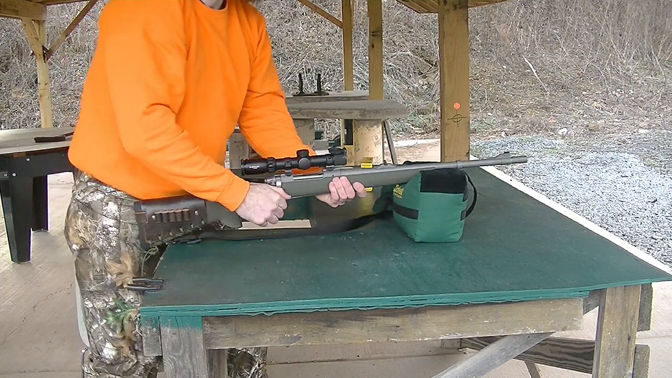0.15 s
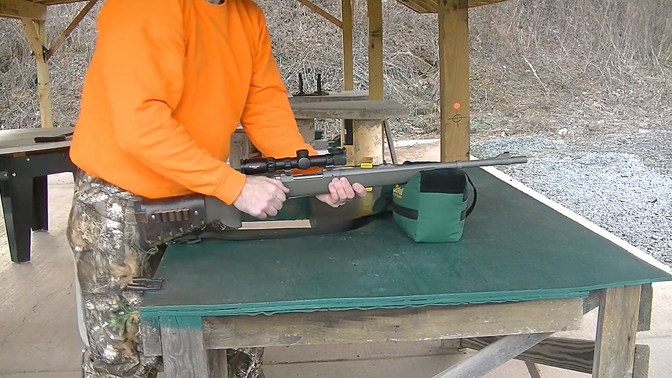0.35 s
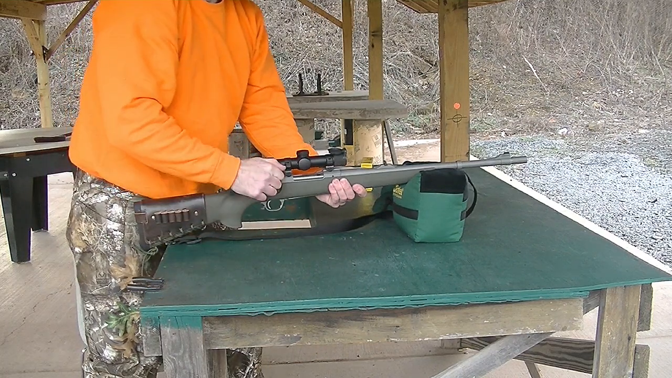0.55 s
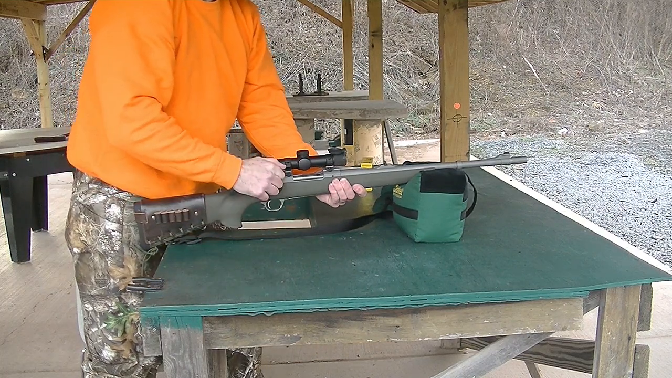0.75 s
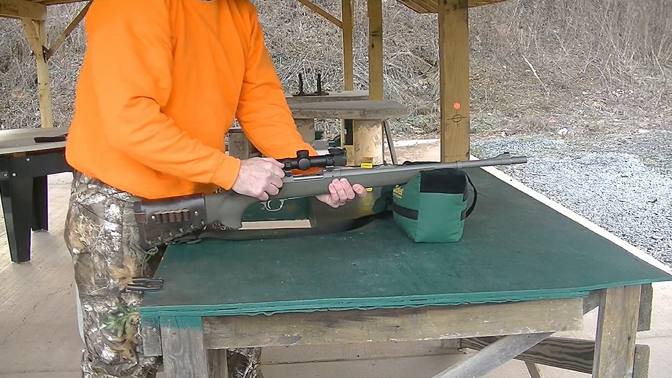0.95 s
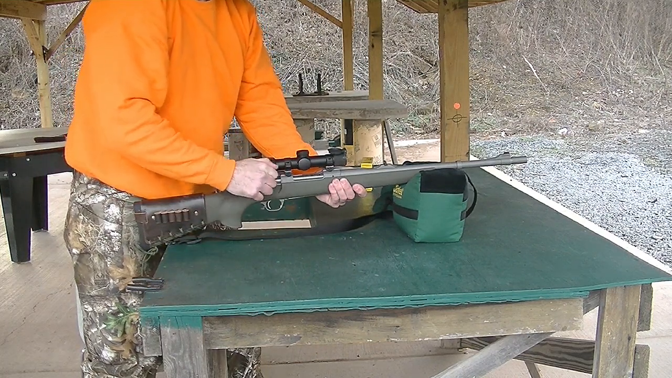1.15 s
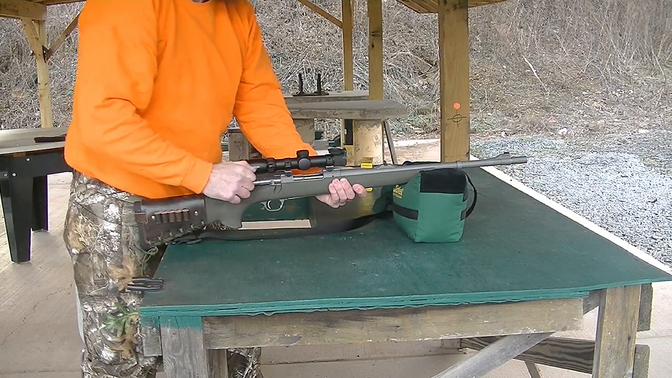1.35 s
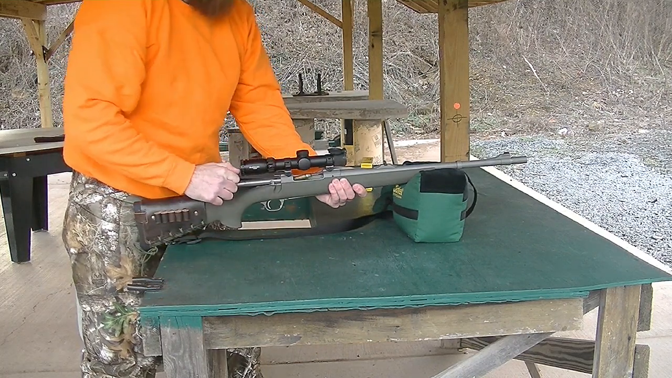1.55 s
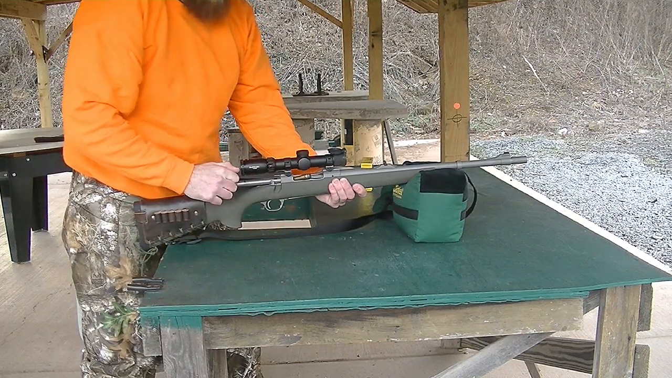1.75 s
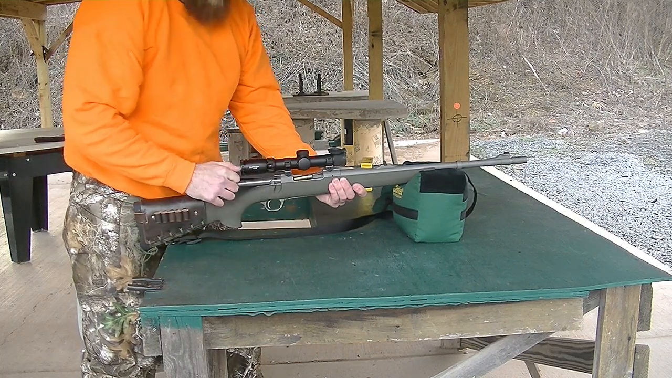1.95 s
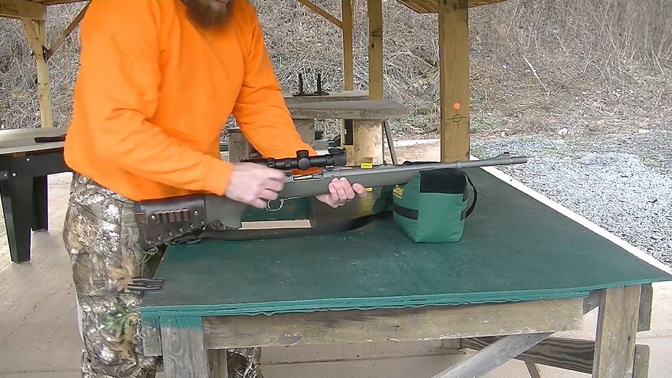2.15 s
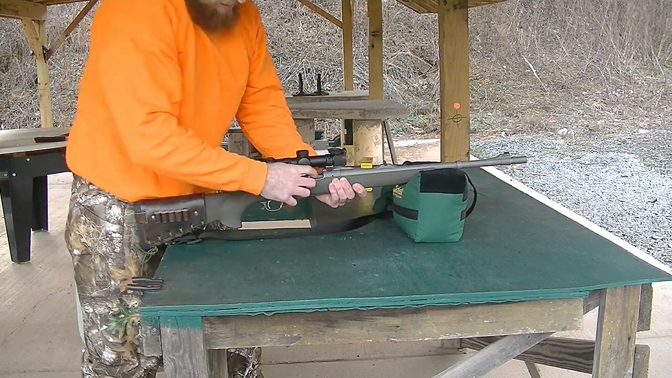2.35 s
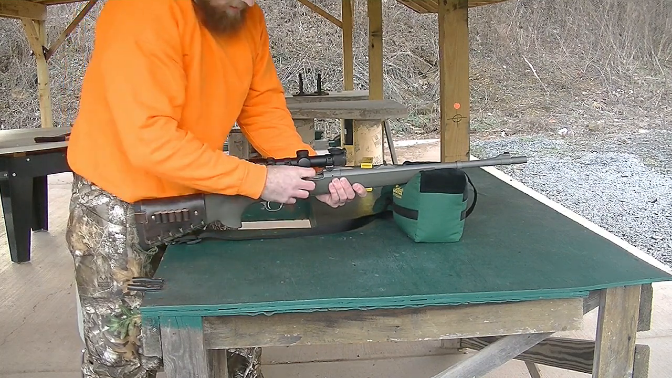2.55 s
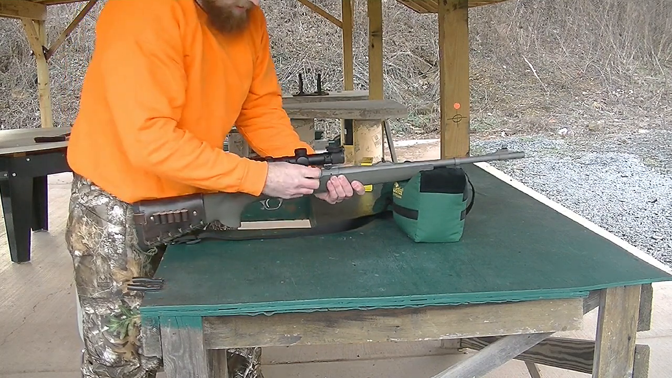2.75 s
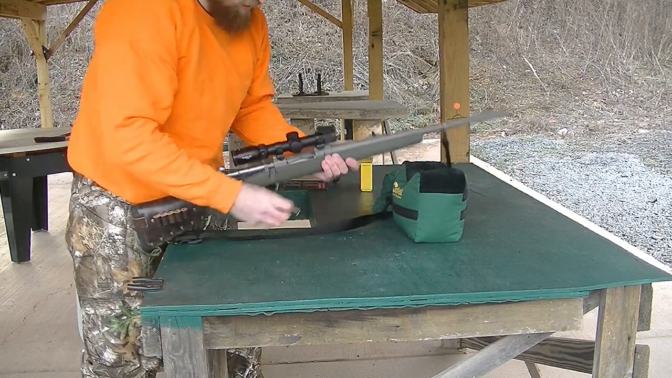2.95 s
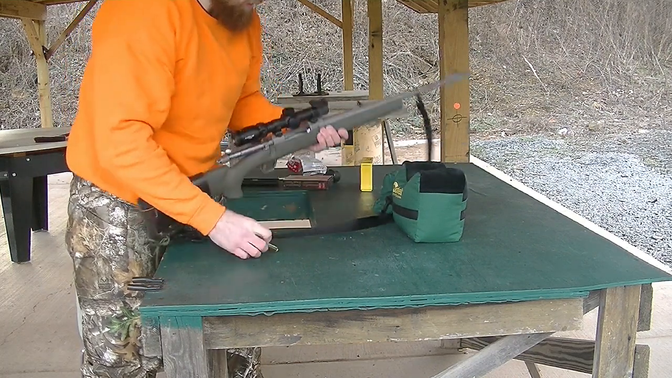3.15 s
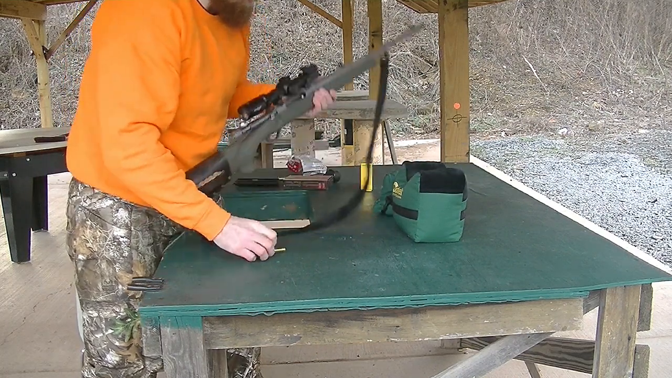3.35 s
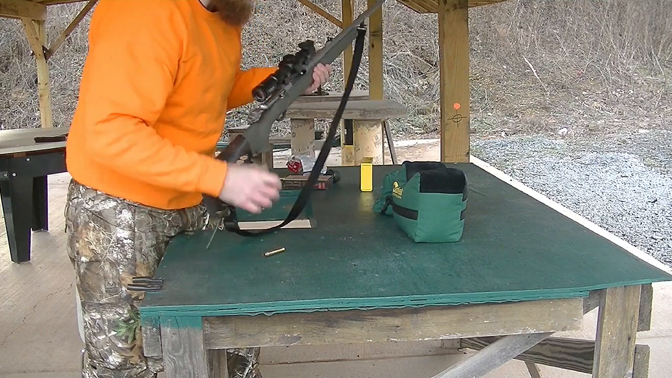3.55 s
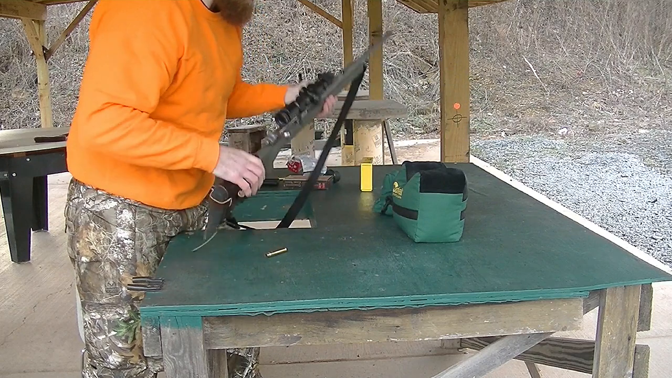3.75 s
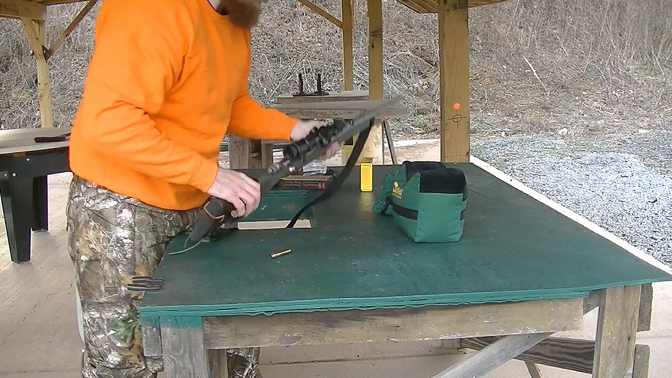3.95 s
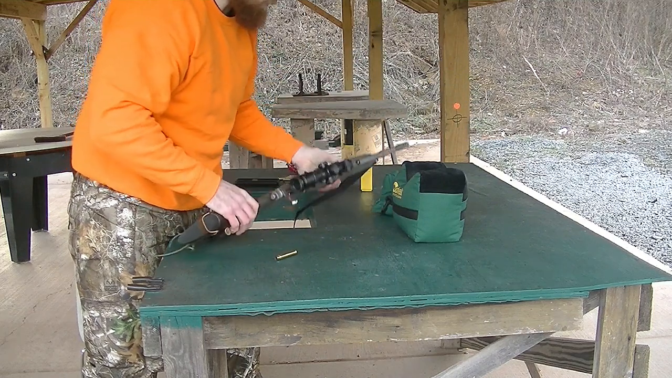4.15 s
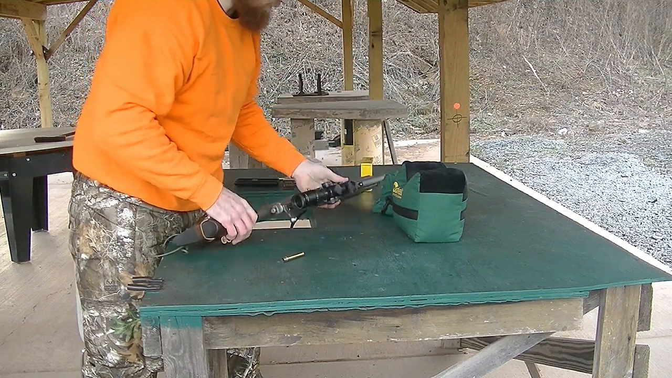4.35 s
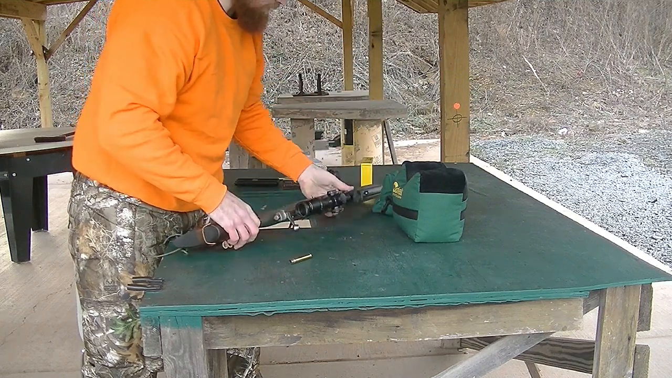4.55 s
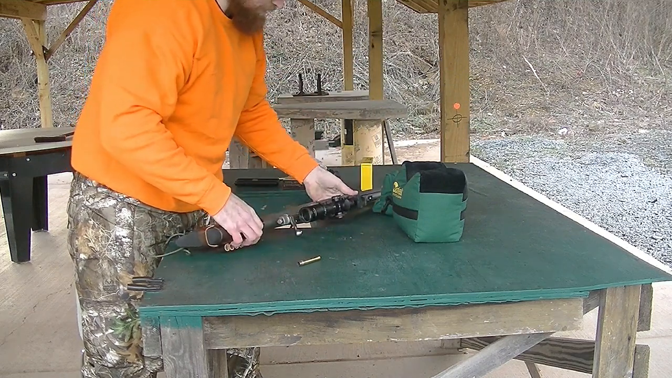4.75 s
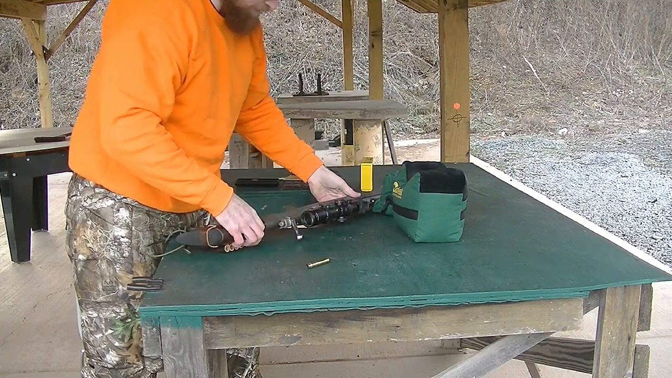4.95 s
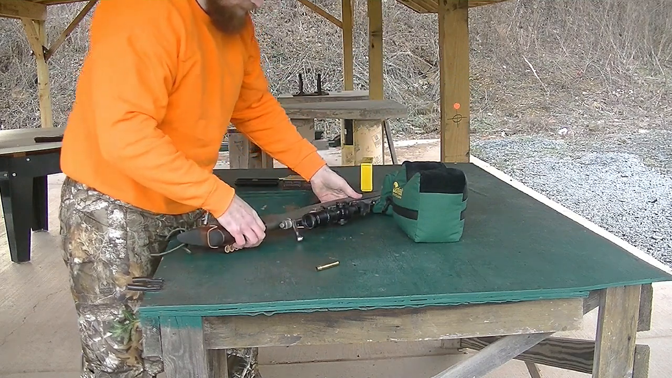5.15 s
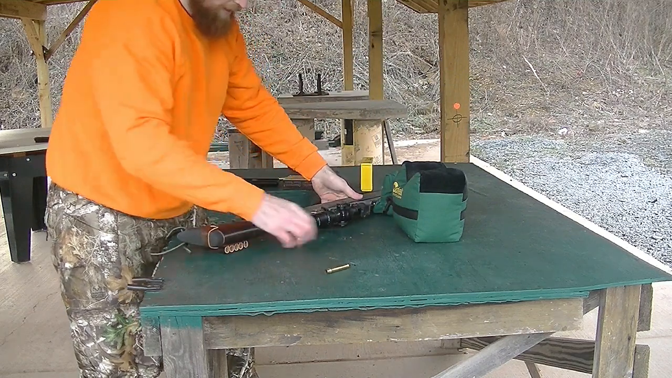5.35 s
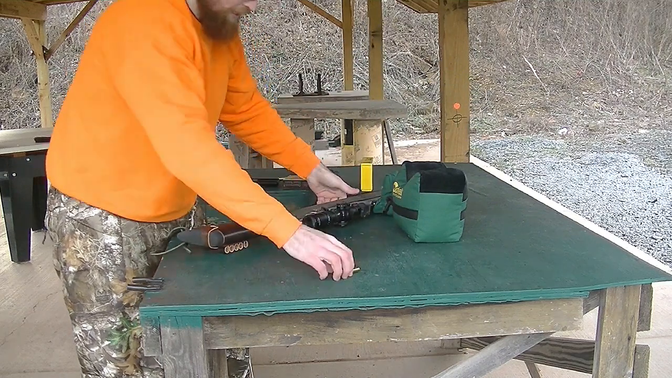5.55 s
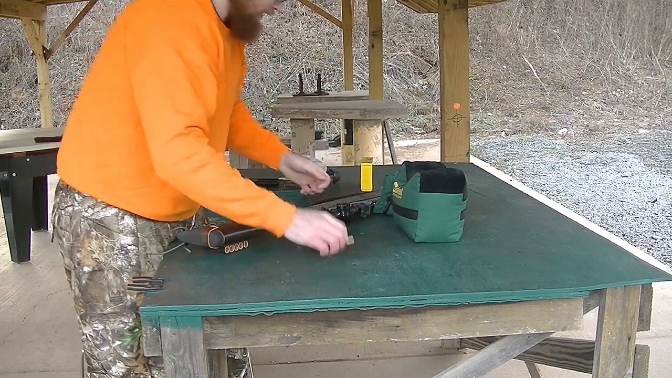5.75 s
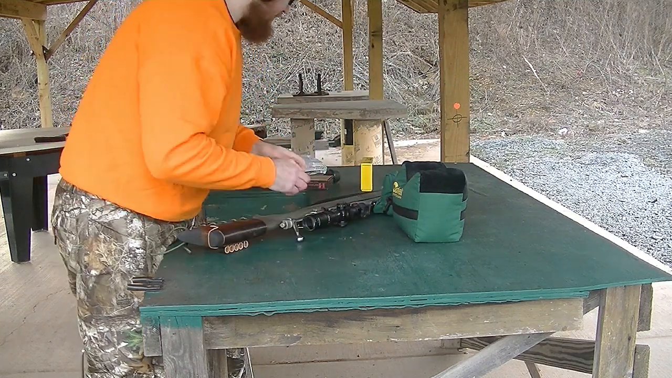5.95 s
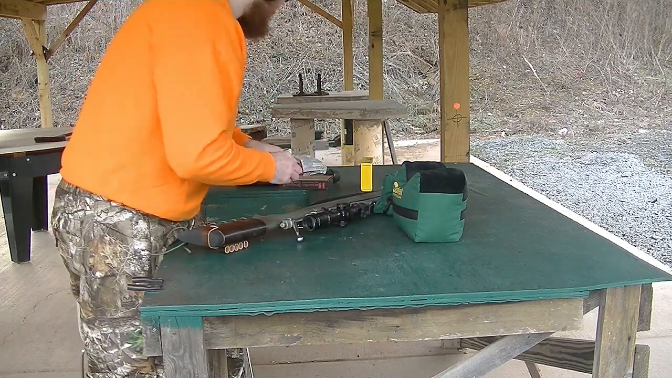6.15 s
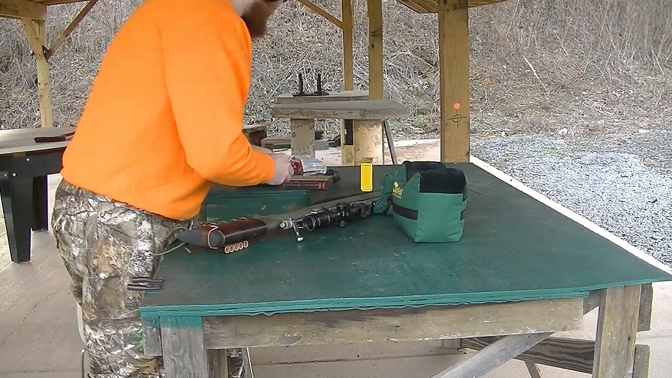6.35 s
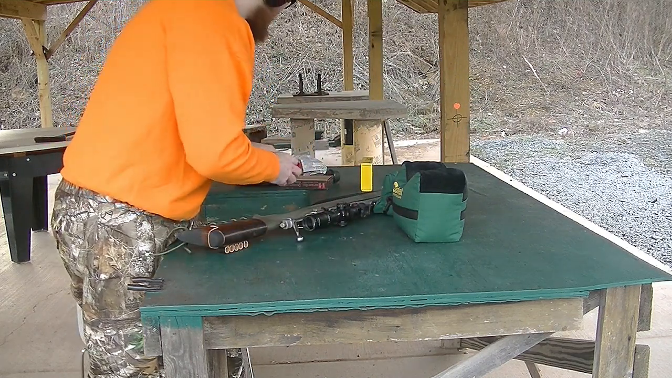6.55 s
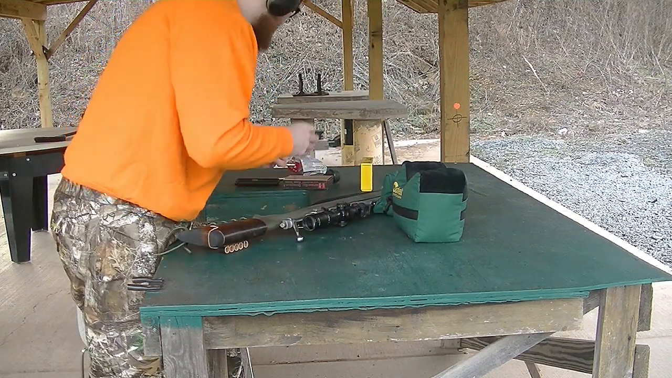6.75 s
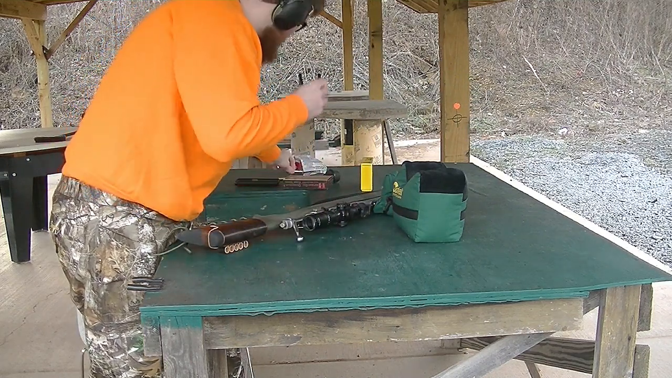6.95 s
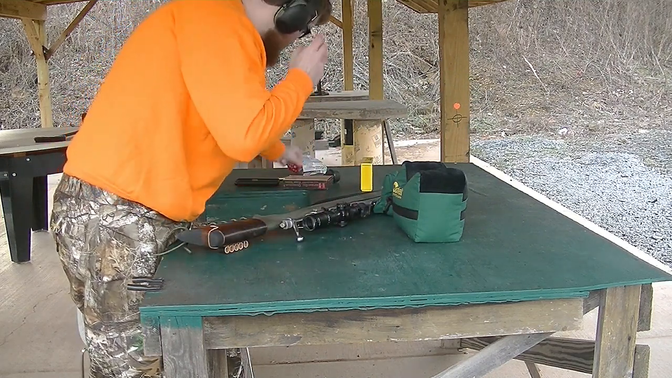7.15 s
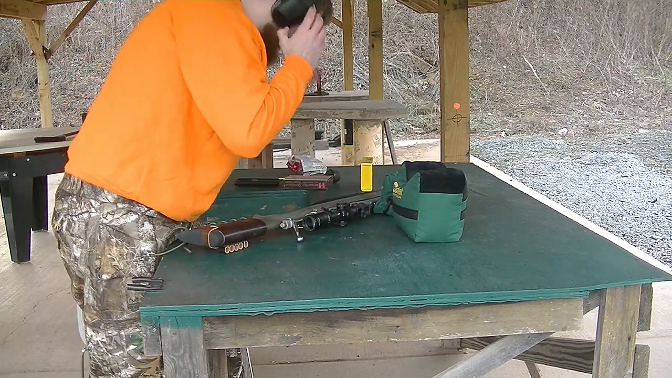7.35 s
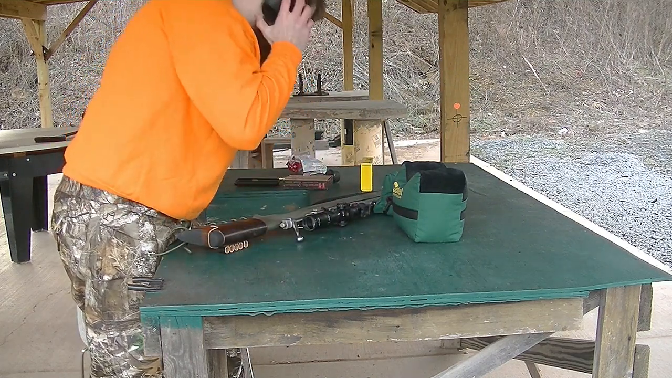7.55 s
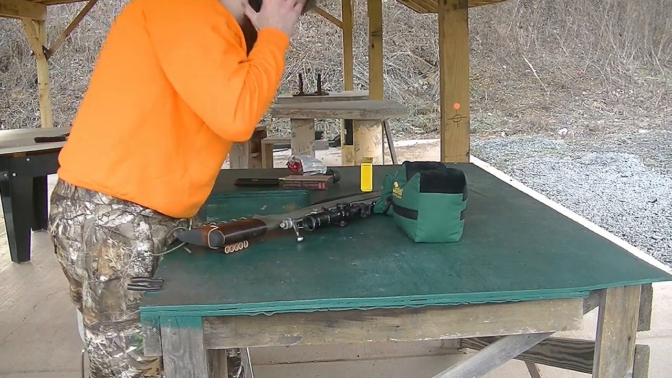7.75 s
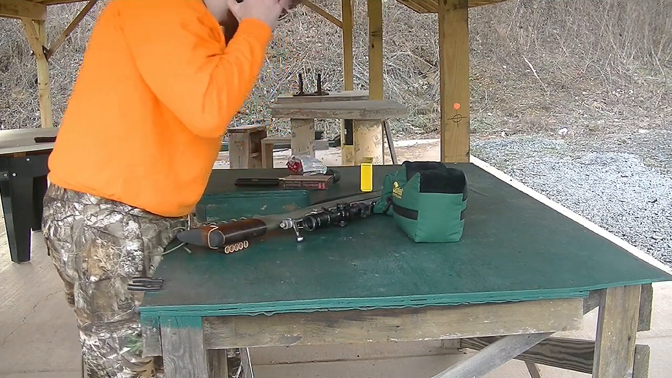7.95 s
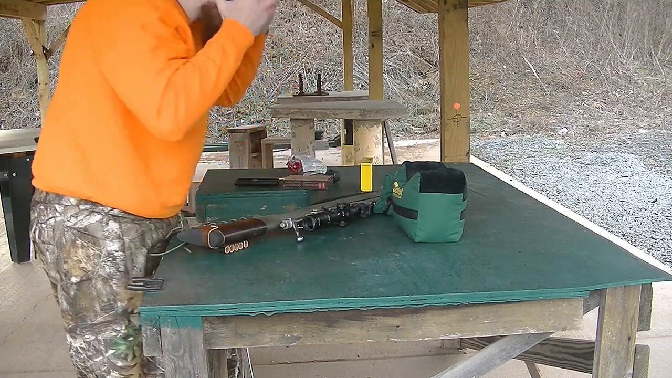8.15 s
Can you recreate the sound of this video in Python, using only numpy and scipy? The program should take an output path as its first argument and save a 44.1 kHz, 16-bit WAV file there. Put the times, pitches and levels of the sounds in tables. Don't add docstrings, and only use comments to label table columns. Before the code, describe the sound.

Close, dry steel sounds under an open shelter: a bolt-action rifle slams hard, clicks and slides, then slams again with a brassy ring. Lighter clacks follow, then a small case taps wood and the rifle is laid on the bench with dull knocks and sling rub. Cloth rustles quietly until a small metal piece drops and bounces in a box. Soft hiss and faint camera motor ticking.

```python
import sys
import numpy as np
from scipy import signal
from scipy.fft import rfft, irfft, next_fast_len
from scipy.io import wavfile
from scipy.ndimage import uniform_filter1d

SR = 44100
rng = np.random.default_rng(int(sys.argv[2]) if len(sys.argv) > 2 else 0)


def store_pcm(level_fs):
    pcm = np.round(np.clip(level_fs, -1, 1) * 32767).astype(np.int16)
    wavfile.write(sys.argv[1], SR, np.atleast_2d(pcm).T)


def volts_from_db(level):
    exponent = np.asarray(level, float) / 20
    return 10 ** exponent


N = 365656


def read(points, hz):
    f, value = np.transpose(points)
    return np.interp(np.log(hz + 1), np.log(f + 1), value)


def evened(x):
    return x / np.sqrt(np.mean(x ** 2) + 1e-20)


def colour(x, points):
    n = next_fast_len(x.shape[-1])
    gain = volts_from_db(read(points, np.fft.rfftfreq(n, 1 / SR)))
    return irfft(rfft(x, n) * gain, n)[..., :x.shape[-1]]


def add(mix, s, sound):
    part = mix[round(s * SR):][:len(sound)]
    part += sound[:len(part)]


def blow(hz, low_db, high_db, t60, body, edge_hz, crack_db, grit_db, count=48):
    t = np.arange(6144) / SR
    t60 = np.clip(t60, 0.01, 0.3)
    f = np.geomspace(500, 15000, count) * rng.uniform(0.93, 1.04, count)
    life = t60 * (f / 3000) ** -0.25 * rng.uniform(0.48, 0.66, count)
    size = volts_from_db(3.8 * rng.standard_normal(count)) * np.sqrt(f / 3000)
    modes = size @ np.exp(np.outer(2j * np.pi * f - np.log(1000) / life, t)).imag
    noise, lumps = rng.standard_normal((2, len(t)))
    grit = noise * volts_from_db(5.0 * evened(uniform_filter1d(lumps, 40)) - 60 * t / t60)
    first_contact = 3.3 * signal.unit_impulse(len(t), 16)
    crack = (noise + first_contact) * volts_from_db(-60 * t / 0.0051)
    x = modes / np.linalg.norm(size) + volts_from_db(grit_db) * grit + volts_from_db(crack_db) * crack
    x *= 1 - np.exp(-t / 0.00017)
    shape = [(150, low_db - 22.5), (600, low_db + 6.0), (1000, low_db + 10),
             (min(0.79 * hz, 1900), -4), (hz, 0.1), (max(1.33 * hz, 4000), -5),
             (edge_hz, high_db + 4.5), (16000, high_db - 7.0)]
    bins = abs(np.fft.fftfreq(len(t), 1 / SR))
    gain = np.log(volts_from_db(read(sorted(shape), bins) + read(body, bins)))
    minimum_phase = np.exp(np.conj(signal.hilbert(gain)))
    x = np.fft.ifft(np.fft.fft(x) * minimum_phase).real
    return x / abs(x).max()


def wake(x, modes):
    return x + sum(volts_from_db(db) * signal.lfilter(*signal.iirpeak(hz, hz / width, SR), x)
                   for hz, width, db in modes)


def stroke(s, end, lo_hz, hi_hz, db, fade_db=0, taper=0.22):
    noise, lumps = rng.standard_normal((2, 16384))[:, :round((end - s) * SR)]
    fibre = noise * volts_from_db(1.2 * evened(uniform_filter1d(lumps, 120)))
    band = [(lo_hz / 4, -50), (lo_hz, -4), (np.sqrt(lo_hz * hi_hz), 0),
            (hi_hz, -5), (1.4 * hi_hz, -24), (2.5 * hi_hz, -60)]
    fade = volts_from_db(db + np.linspace(0, fade_db, len(noise)))
    return fade * evened(colour(fibre, band)) * signal.windows.tukey(len(noise), taper)


def ring(hz, db, t60, flutter_db):
    t = np.arange(SR // 3) / SR
    twin_hz = hz + 35 * rng.standard_normal()
    pair = np.sin(2 * np.pi * hz * t) + 0.78 * np.sin(2 * np.pi * twin_hz * t)
    grip_db = flutter_db * evened(uniform_filter1d(rng.standard_normal(len(t)), size=300))
    return volts_from_db(db + grip_db - 60 * t / t60) * np.minimum(t / 0.0013, 1) * pair


# start_s, level_db, pitch_hz, decay_s
BOLT_SLAMS = [(2.6264, -16.5, 5570, 0.07), (0.5379, -9.5, 6000, 0.1), (0.542, -13.5, 5000, 0.14),
              (0.5464, -10.5, 3820, 0.12), (.5515, -10, 3730, 0.082), (0.5565, -3.5, 3750, 0.072),
              (0.5662, -18, 3600, 0.13), (0.5735, -18.5, 3600, 0.22), (0.594, -29, 3600, 0.25),
              (0.612, -28, 3700, 0.28), (1.4812, -34.5, 7020, 0.054), (1.6092, -21.5, 5300, 0.07),
              (1.6199, -18.5, 5410, 0.14), (1.6344, -19, 5030, 0.037), (1.642, -14, 3520, 0.16),
              (1.6600, -14, 6500, 0.071), (1.663, -8.5, 3960, 0.28), (1.6660, -4.5, 5000, 0.13),
              (1.6699, -4, 2960, 0.078), (1.6735, -12.5, 3500, 0.12), (1.685, -17.5, 3700, .15),
              (2.749, -34, 5000, 0.027)]
# start_s, level_db, pitch_hz, decay_s
STEEL_CLACKS = [(0.1568, -35, 2670, 0.039), (0.3326, -33.5, 2300, 0.088), (0.3734, -31, 3280, 0.068),
                (0.463, -18.5, 4500, 0.088), (1.2205, -36.5, 1480, 0.15), (1.2752, -25.5, 4200, 0.13),
                (1.4368, -41, 3744, 0.1), (1.5834, -35, 5720, 0.2), (1.8433, -39.5, 1660, 0.14),
                (1.9197, -33, 3480, 0.15), (2.0268, -47, 3470, 0.12), (2.0488, -30.5, 1630, 0.067),
                (2.0638, -33.5, 3900, 0.052), (2.5343, -37, 3300, 0.37), (2.587, -29, 2650, 0.12),
                (2.604, -27.5, 2380, 0.32), (2.631, -27, 3850, 0.098), (2.7182, -36.5, 3460, 0.15),
                (3.9805, -18.5, 3020, 0.016)]
# start_s, end_s, lowest_hz, highest_hz, level_db
BOLT_SLIDES = [(.47, .56, 1490, 5800, -49), (1.085, 1.146, 1790, 4200, -55), (1.193, 1.26, 901, 3750, -62),
               (1.297, 1.396, 1780, 7000, -57.5), (1.408, 1.465, 1380, 6750, -55.5),
               (1.567, 1.614, 2820, 7500, -55), (1.807, 1.918, 1500, 4700, -59.5),
               (2.54, 2.615, 1800, 4500, -60), (2.697, 2.76, 2000, 6860, -54.5)]
# pitch_hz, level_db
RIFLE_BODY = [(200, -19.5), (700, -6.5), (1080, 6), (1300, -1), (1700, 0), (2250, -3), (3500, 1.5),
              (9000, 0.5)]
# pitch_hz, width_hz, level_db
ACTION_MODES = [(1076, 60, -2), (1540, 61, 0), (1760, 57, -0.5), (1997, 38, 3), (2380, 60, -5),
                (2840, 76, -1), (3120, 41, -3.5), (3370, 52, -2), (3750, 82, 1.5), (4750, 42, -6),
                (5320, 35, 2.5), (6050, 83, 0.5), (6900, 80, -1.5), (11700, 2100, 3.5)]


def bolt_action():
    steel = np.zeros(N)
    for rows, low_db, high_db in ((STEEL_CLACKS, -26.5, -33), (BOLT_SLAMS, -25, -22.5)):
        for s, db, hz, t60 in rows:
            hit = blow(hz, low_db, high_db, t60, RIFLE_BODY, 9670, crack_db=16, grit_db=2.5)
            add(steel, s, volts_from_db(db) * hit)
    for row in BOLT_SLIDES:
        add(steel, row[0], stroke(*row))
    return volts_from_db(-1.5) * wake(steel, ACTION_MODES)


# start_s, pitch_hz, level_db, decay_s
LOOSE_RINGS = [(0.538, 1800, -22, 0.024), (0.539, 2240, -35.5, 0.091), (0.561, 1177, -28, 0.071),
               (0.699, 1290, -39, 0.017), (1.621, 3430, -32, 0.033), (1.643, 3390, -11.5, 0.03),
               (1.668, 1107, -34.5, 0.21), (1.85, 1684, -50.5, 0.33), (1.884, 3330, -49, 0.071),
               (3.244, 2686, -30.5, 0.033), (1.921, 3290, -48.5, 0.12), (2.608, 3900, -43, 0.092),
               (2.718, 3780, -51, 0.14), (2.762, 1040, -50, 0.1), (3.248, 515, -46.5, 0.1),
               (3.251, 1270, -49.5, 0.094), (7.143, 1647, -21.5, 0.073), (3.98, 3125, -34, 0.03),
               (0.558, 1560, -19.5, 0.039), (3.985, 2320, -37, 0.05)]


def loose_rings():
    out = np.zeros(N)
    for s, hz, db, t60 in LOOSE_RINGS:
        add(out, s, ring(hz, db, t60, flutter_db=1))
    return out


# pitch_hz, decay_s, [(start_s, level_db)] for each excitation
BRASS_MODES = [
    (5300, 0.25, [(1.11, -61), (1.61, -48), (1.642, -26), (1.7, -43), (1.935, -62), (5.65, -55), (7.31, -55.5)]),
    (6930, 0.099, [(1.276, -44), (1.667, -31)]),
    (8142, 0.14, [(1.365, -52), (1.702, -39)]),
    (10262, 0.18, [(1.645, -35), (1.695, -39), (1.726, -37.5), (7.148, -46), (7.165, -44.5), (7.23, -56), (7.28, -56.5)]),
    (13640, 0.152, [(1.365, -61), (1.575, -59.5), (1.642, -32), (1.683, -36), (1.725, -50)]),
]


def brass_case():
    out = np.zeros(N)
    for hz, t60, taps in BRASS_MODES:
        for s, db in taps:
            add(out, s, ring(hz, db, t60, flutter_db=2))
    return out


# start_s, level_db, pitch_hz, body_db under it,
# decay_s
PLANK_KNOCKS = [(1.274, -28, 1919, -4.5, 0.13), (3.2445, -27, 2670, 1, 0.13),
                (3.3821, -33, 2600, -26, 0.066), (3.473, -23, 2190, -14, 0.13),
                (3.4995, -31.5, 1820, -9, 0.21), (3.517, -27, 5300, -7.5, 0.21),
                (3.9853, -29.5, 2480, -14, 0.16), (4.156, -38, 2740, -14.5, 0.13),
                (4.2515, -40, 3400, -23, 0.03), (4.2777, -37.5, 2600, -14, 0.05),
                (4.3113, -37, 3370, -12, 0.11), (4.3597, -42, 3000, -2, 0.054), (4.5624, -42, 1820, 0, 0.3),
                (4.7917, -38.5, 1610, 2, 0.14), (5.4733, -41.5, 1640, -3, 0.1),
                (5.6078, -39, 2530, 1, 0.11), (5.6374, -33, 2780, -9, 0.19)]
# start_s, level_db, pitch_hz, decay_s
LIGHT_TICKS = [(2.7591, -12.5, 2260, 0.05), (2.7709, -26, 1920, 0.18), (3.4887, -29.5, 1560, 0.11),
               (3.244, -25, 5570, 0.022), (4.0475, -40, 3080, 0.11), (4.511, -32, 3400, 0.015),
               (4.621, -39.5, 3800, 0.075), (5.3188, -30.5, 2040, 0.03), (5.322, -27, 3560, 0.055),
               (3.463, -39, 5520, .05), (1.366, -47, 6000, .05), (1.375, -41, 6000, .05),
               (5.788, -42, 2670, 0.079), (5.902, -43, 5060, 0.12), (6.896, -44, 4000, 0.066),
               (7.1435, -22, 6100, 0.3), (8.039, -44, 3080, 0.35), (8.142, -41.5, 3100, 0.1)]
# pitch_hz, level_db
WOOD_BODY = [(200, 7.5), (500, -1.5), (1000, 1), (1500, 2.5), (3000, 1), (4600, -4.5), (9000, -8),
             (14000, -5)]


def bench():
    out = np.zeros(N)
    hits = [(s, db, hz, low_db, -25, t60) for s, db, hz, low_db, t60 in PLANK_KNOCKS]
    hits += [(s, db, hz, -27.5, -14.5, t60) for s, db, hz, t60 in LIGHT_TICKS]
    for s, db, *rest in hits:
        add(out, s, volts_from_db(db) * blow(*rest, WOOD_BODY, 8200, crack_db=14.0, grit_db=-1.0))
    return out


# start_s, level_db, pitch_hz, decay_s
CASE_BOUNCES = [
    (7.1389, -17, 1520, 0.079),
    (7.1419, -6.5, 1740, 0.08),
    (7.1465, -11, 2420, 0.24),
    (7.152, -13.5, 2300, .15),
    (7.176, -18, 2600, 0.22),
    (7.2205, -16.5, 1580, 0.18),
    (7.2567, -25, 2620, 0.17),
    (7.29, -30, 2800, .12),
]
# start_s, end_s, lowest_hz, highest_hz, level_db
BOX_SETTLING = (7.15, 7.5, 900, 3800, -28.5)
# pitch_hz, width_hz, level_db
BOX_MODES = [(917, 50, 0), (1380, 40, -2), (1720, 49, -1), (1890, 64, -4), (2325, 47, 2), (2580, 34, 2),
             (3095, 60, 4.5), (3530, 90, 0)]


def box():
    out = np.zeros(N)
    for s, db, hz, t60 in CASE_BOUNCES:
        add(out, s, volts_from_db(db) * blow(hz, -16, -27, t60, WOOD_BODY, 6500, crack_db=7, grit_db=-2.5))
    add(out, BOX_SETTLING[0], stroke(*BOX_SETTLING, fade_db=-31, taper=0.09))
    return volts_from_db(-3.0) * wake(out, BOX_MODES)


# start_s, end_s, pitch_hz,
# width_hz, level_db
SINGING_BANDS = [(7.218, 7.24, 1730, 1060, -30.5), (2.76, 2.81, 1880, 1500, -38),
                 (1.27, 1.315, 1090, 60, -44), (1.393, 1.47, 5340, 30, -60), (1.437, 1.47, 3740, 60, -53),
                 (1.36, 1.471, 1800, 220, -55), (1.455, 1.466, 6100, 200, -53),
                 (2.72, 2.748, 3800, 250, -51), (3.244, 3.275, 900, 820, -46.5),
                 (3.428, 3.45, 2000, 200, -54), (3.475, 3.555, 5800, 130, -56), (3.508, 3.54, 950, 500, -50),
                 (3.75, 3.98, 3080, 120, -57.5), (3.748, 3.98, 2430, 80, -59), (3.76, 3.97, 3800, 120, -68),
                 (5.322, 5.2, 1750, 200, -54), (5.36, 5.44, 3550, 65, -50), (5.512, 5.56, 2950, 120, -56),
                 (.531, .546, 6000, 4800, -29), (1.273, 1.285, 12500, 3850, -55),
                 (1.479, 1.5, 12000, 2500, -53), (1.65, 1.69, 12800, 3000, -33.5),
                 (2.63, 2.68, 10500, 2500, -51), (2.756, 2.81, 10200, 500, -48),
                 (2.76, 2.79, 14000, 1000, -53), (7.145, 7.4, 12500, 2500, -63),
                 (7.148, 7.195, 14430, 40, -60), (7.23, 7.31, 14430, 40, -64), (7.19, 7.29, 8142, 35, -57.5),
                 (7.14, 7.2, 6730, 1800, -30.5), (3.244, 3.285, 2700, 430, -50)]


def singing_parts():
    out = np.zeros(N)
    for s, end, hz, width, db in SINGING_BANDS:
        noise = rng.standard_normal(12288)
        peak = signal.iirpeak(hz, hz / width, SR)
        x = signal.lfilter(*peak, signal.lfilter(*peak, noise))
        x = evened(x)[-round((end - s) * SR):]
        swell = np.sin(np.pi * np.linspace(0, 1, len(x)) ** 0.55)
        add(out, s, volts_from_db(db) * x * swell)
    return out


# start_s, end_s, lowest_hz, highest_hz, level_db
SLING_STROKES = [(3.008, 3.163, 1690, 6200, -52.5), (3.262, 3.33, 299, 1500, -55),
                 (3.341, 3.433, 1780, 3400, -49), (3.499, 3.582, 600, 7060, -50.5),
                 (3.748, 3.978, 2100, 3920, -54), (3.86, 3.97, 5200, 6460, -60.5),
                 (4.08, 4.113, 4470, 7400, -55), (4.155, 4.205, 1800, 3480, -66),
                 (4.732, 4.76, 1510, 3500, -57), (4.729, 4.755, 6000, 7000, -61),
                 (5.316, 5.372, 1540, 5000, -48), (5.326, 5.406, 245, 377, -54),
                 (5.474, 5.585, 1470, 3500, -49.5), (5.523, 5.573, 2600, 3270, -58),
                 (5.636, 5.715, 400, 3930, -52)]


def sling_strokes():
    out = np.zeros(N)
    for row in SLING_STROKES:
        add(out, row[0], stroke(*row))
    return out


# start_s, level_db
CLOTH_EFFORT = [(0, -57), (.39, -61), (.76, -56), (.95, -73), (1.3, -52), (1.85, -62), (2.05, -65.5),
                (2.9, -65.5), (3.3, -55.5), (4.13, -50.5), (4.32, -59), (5.0, -61), (5.5, -48.5),
                (5.96, -60.5), (6.3, -64.5), (7.7, -69.5), (8.15, -53.5), (8.29, -56)]
# start_s, level_db
BENCH_SCUFF = [(0, -58), (.53, -52.5), (.76, -57), (1.3, -63), (1.85, -65.5), (2.31, -67), (2.6, -62.5),
               (3.0, -62.5), (3.3, -59), (3.8, -67), (4.13, -59.5), (4.57, -61), (4.94, -53), (5.6, -53),
               (5.96, -67), (6.56, -61.5), (6.9, -66.5), (8.29, -67.5)]
# pitch_hz, level_db
RUBBING_RANGE = [(60, -30), (200, 0), (9000, 0), (14000, -30)]


def rubbing():
    t = np.arange(N) / SR
    effort_db = np.interp(t, *np.transpose(CLOTH_EFFORT))
    scuff_db = np.interp(t, *np.transpose(BENCH_SCUFF))
    fizz_db = -66 + (effort_db + 59.0)
    slip_sizes = volts_from_db(1.2 * np.minimum(rng.exponential(1, N), 5))
    happens = rng.random(N) < 5000 / SR
    slips = slip_sizes * happens * rng.standard_normal(N)
    slips *= volts_from_db(1.44 * evened(uniform_filter1d(rng.standard_normal(N), 500)))
    cloth = [(900, -16.0), (1600, 1.5), (2900, 2.5), (4200, -1.5), (5500, -54.0)]
    scuff = [(120, -6.5), (300, -2.5), (700, -0.5), (1300, -3.5), (1900, -29)]
    fizz = [(3600, -74), (4800, 7.5), (6500, 8.5), (8000, -4), (12000, -16.0)]
    parts = ((effort_db, cloth), (scuff_db, scuff), (fizz_db, fizz))
    return colour(sum(volts_from_db(db) * evened(colour(slips, band)) for db, band in parts), RUBBING_RANGE)


# pitch_hz, decay_s
SHELTER_DECAY = [(300, 0.33), (1000, 0.29), (3000, 0.3), (6000, 0.29), (12000, 0.11)]


def shelter(x):
    taps = np.zeros((2, SR // 2))
    slots = np.arange(120, SR // 2 - 20, 20)
    at = slots + rng.integers(0, 20, (1, len(slots)))
    signs = rng.choice([-1., 1.], (2, len(slots)))
    np.put_along_axis(taps, np.vstack([at, at]), signs, 1)
    hz, t, z = signal.stft(taps, SR, nperseg=256)
    decay = volts_from_db(-60 * t / read(SHELTER_DECAY, hz)[:, None])
    mid, side = signal.istft(z * decay, SR, nperseg=256)[1]
    side = colour(side, [(250, 0.1), (600, -7), (1500, -8), (4000, -6), (9000, -4)])
    response = np.array([mid + side, mid - side]) / np.linalg.norm(mid)
    return signal.fftconvolve(x[None], response, axes=1)[:, :N]


MOTOR_RUNS = [
    .0172,
    3.5222,
    4.8552,
    6.3242,
]
# pitch_hz, level_db, delay_s, length_s, spread_db
STEP_MODES = [(5800, -59, 0.0023, 0.012, 0.5), (1926, -61.5, 0.009, 0.02, 7.5),
              (1948, -59, 0.00298, 0.011, 4), (1340, -59.5, 0.0039, 0.014, 6.5),
              (990, -78, 0.00286, 0.029, 4.5), (449, -61.5, 0.00259, 0.017, 3.5),
              (4800, -81, 0.011, .01, 4)]
# start_s, level_db
CATCH_CLICKS = [
    (4.8224, -25.5),
    (6.2908, -25.5),
]
# pitch_hz, level_db, decay_s
CATCH_RING = [(1630, 10, 0.063), (1915, 11, 0.032), (2670, 10, 0.0082), (3000, -2, 0.039),
              (4200, -16, 0.043)]


def lens():
    out, jolts = np.zeros((2, N))
    for s in np.add.outer(MOTOR_RUNS, np.arange(14) / 30).ravel():
        draws = rng.standard_normal((len(STEP_MODES), 3))
        for (hz, db, delay, length, spread_db), (a, b, c) in zip(STEP_MODES, draws):
            t = np.arange(0, length, 1 / SR)
            step_hz = hz + 140 * b * (hz < 1700)
            burst = np.sin(np.pi * t / length) * np.sin(2 * np.pi * step_hz * t + 9 * c)
            start = s + abs(delay + 0.00036 * spread_db * c)
            add(out, start, volts_from_db(db + spread_db * np.tanh(a)) * burst)
        jolt_db = -56.5 + 0.31 * rng.standard_normal()
        add(jolts, s, volts_from_db(jolt_db) * np.hanning(400) * rng.standard_normal(400))
    out += 4 * colour(jolts, [(300, 0), (1500, 0), (3500, -16), (6000, -40)])
    t = np.arange(2000) / SR
    click = sum(volts_from_db(db - 60 * t / np.clip(t60, 0.01, 0.03)) * np.sin(2 * np.pi * hz * t)
                for hz, db, t60 in CATCH_RING)
    click *= np.minimum(t / 0.0006, 1)
    for s, db in CATCH_CLICKS:
        for lag, lag_db in ((0, -6), (0.0045, -11)):
            add(out, s + lag, volts_from_db(db + lag_db) * click / abs(click).max())
    return colour(out, [(100, -42), (350, 1.76)]) * volts_from_db(np.array([[0.6], [-0.6]]))


# pitch_hz, level_db per Hz
HISS_SPECTRUM = [(20, -24.5), (87, -12.5), (232, -3), (450, -2.5), (932, -11), (1700, -12), (4680, -9),
                 (15500, -15.5)]
# pitch_hz, level_db of side minus mid
HISS_WIDTH = [(60, 6), (150, 6), (500, 4.5), (1290, 7.5), (2380, 2.5), (4400, -4), (8120, -11.5),
              (15000, -44)]


def floor():
    hiss_db, hiss_top_hz, whine_hz, whine_db = -60, 15720, 4740, -78.5
    n = next_fast_len(N)
    top = [(hiss_top_hz - 700, 0), (hiss_top_hz - 60, -5), (hiss_top_hz, -50)]
    a, b, c = colour(rng.standard_normal((3, n)), top)
    mid = colour(a, HISS_SPECTRUM)
    side = colour(colour(b, HISS_SPECTRUM), HISS_WIDTH)
    whine = evened(colour(c, [(whine_hz - 90, -60), (whine_hz, 0), (whine_hz + 90, -60)]))
    scale = volts_from_db(hiss_db) / mid.std()
    return (scale * np.array([mid + side, mid - side]) + volts_from_db(whine_db) * whine)[:, :N]


# pitch_hz, level_db of left minus right
LEFT_LEAN = [(250, 7.5), (500, 8), (1000, 4), (2000, 1.4), (8000, 0)]


def scene():
    handling = bolt_action() + loose_rings() + brass_case() + bench() + box()
    handling += singing_parts() + sling_strokes()
    low_cut = signal.butter(2, 170, "high", fs=SR)
    near = signal.lfilter(*low_cut, handling) + volts_from_db(-5.5) * rubbing()
    heard = near + volts_from_db(-10.5) * shelter(near)
    lean = [[(hz, side * db / 2) for hz, db in LEFT_LEAN] for side in (1, -1)]
    return np.array([colour(c, p) for c, p in zip(heard, lean)]) + lens() + floor()


def top_cut(x):
    return signal.sosfilt(signal.butter(12, 16660, fs=SR, output="sos"), x)


def record(dry):
    return top_cut(dry)


dry = scene()
out = record(dry)
store_pcm(out)
```